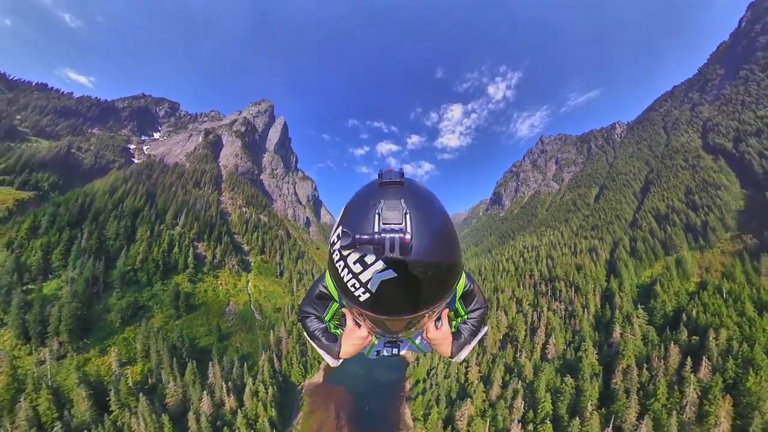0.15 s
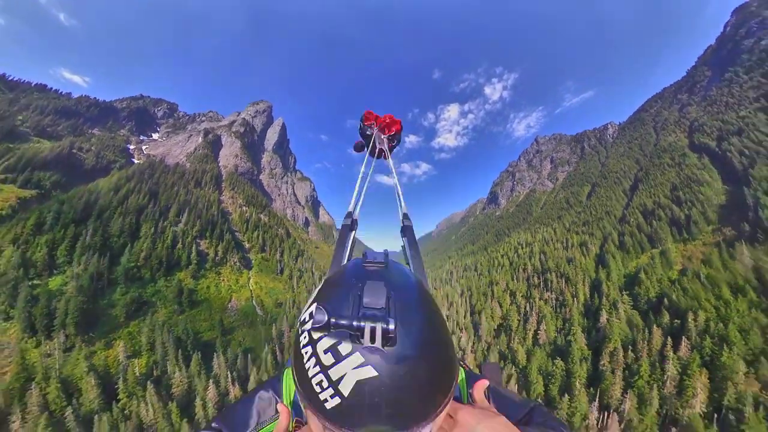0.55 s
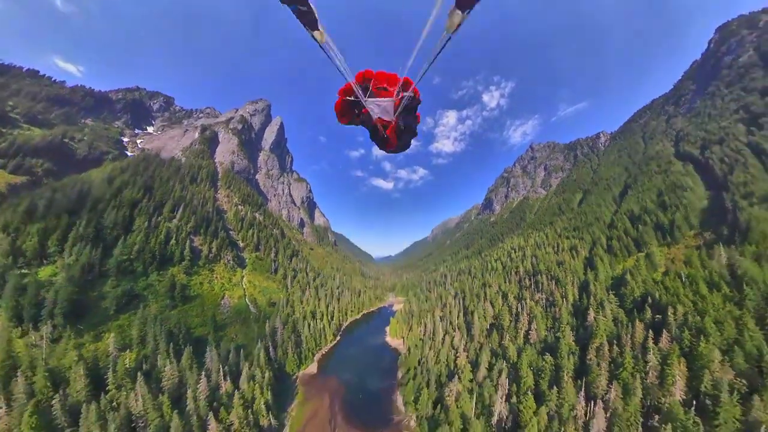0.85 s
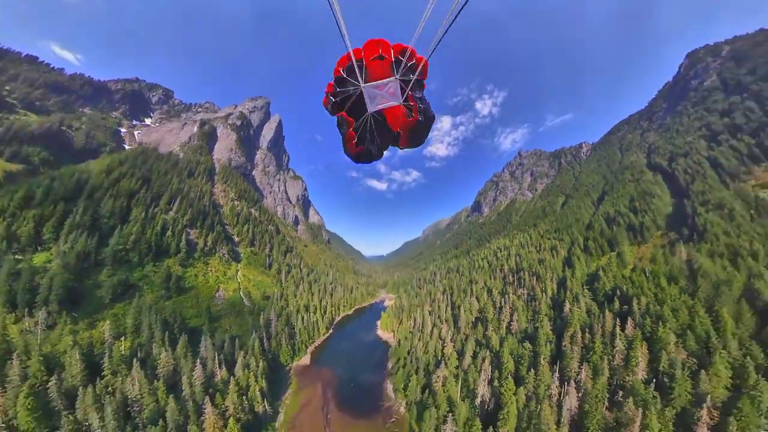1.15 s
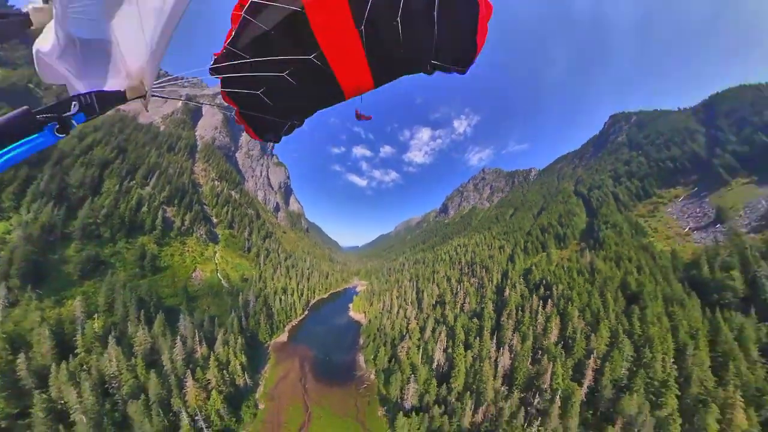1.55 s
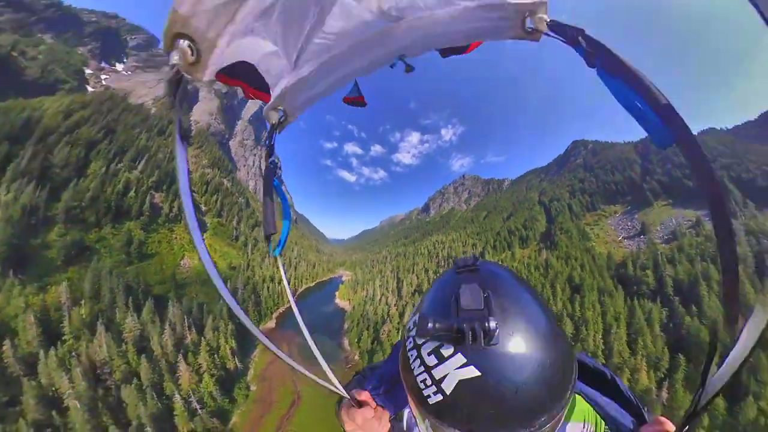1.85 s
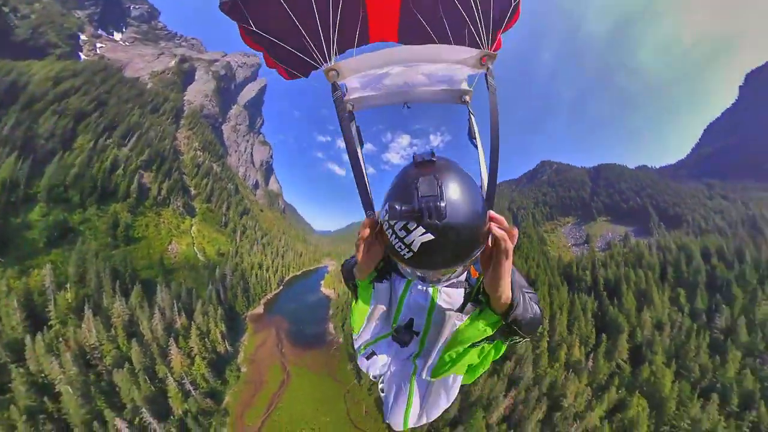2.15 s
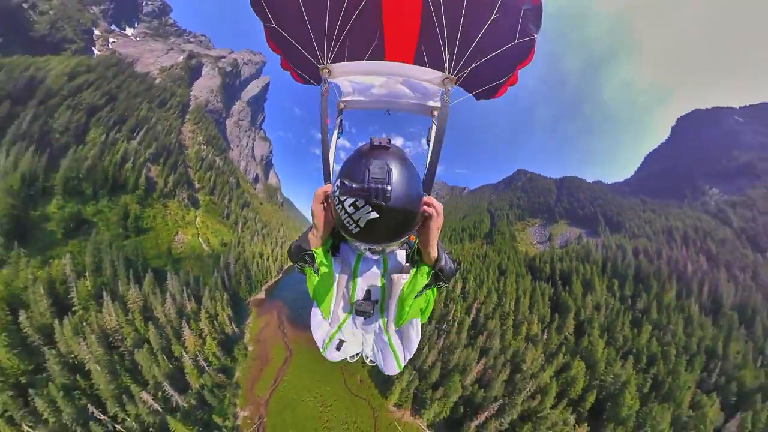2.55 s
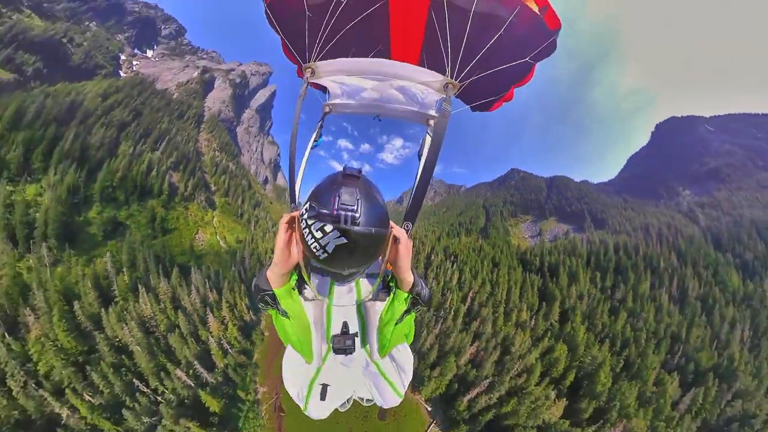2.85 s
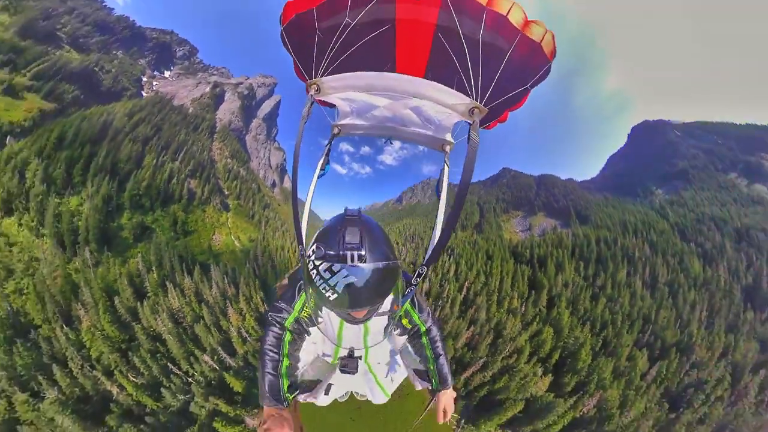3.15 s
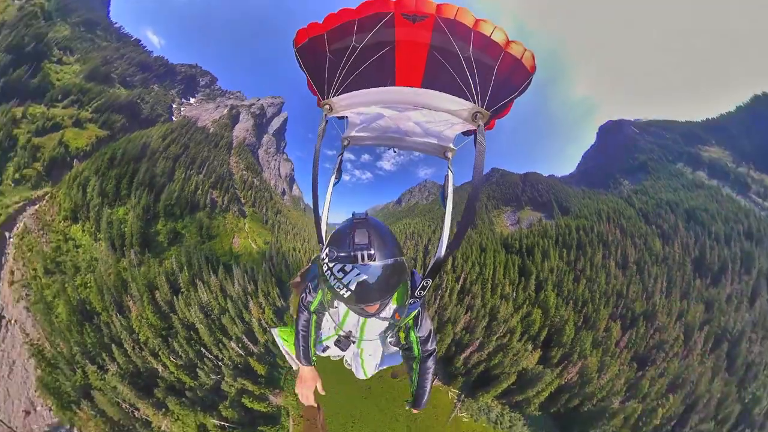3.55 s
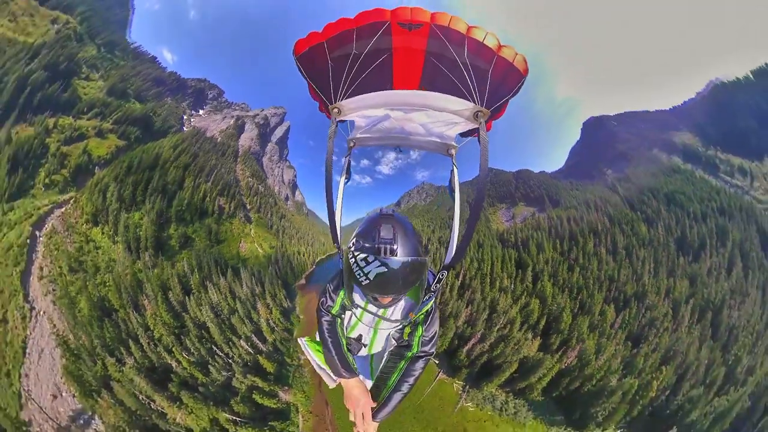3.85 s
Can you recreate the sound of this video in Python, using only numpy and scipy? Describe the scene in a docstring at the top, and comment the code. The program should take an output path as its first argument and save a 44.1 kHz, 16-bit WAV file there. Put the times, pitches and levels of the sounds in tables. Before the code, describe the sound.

Rushing wind hisses and faintly moans on a jumper's helmet microphone in open air, until a short rip of fabric releases the parachute. Heavy, thudding gusts follow, then uneven roaring wind with sharp canopy snaps, mainly on the right.

```python
"""Wind rushes over two microphone ports on a jumper's helmet, its turbulence heard as rumble, roar and hiss.
In free fall the flow is steady and moans over the housing, until fabric rips out of the pack on the left.
As the canopy fills and slows the fall, gusts buffet the ports unevenly, mostly the right one.
Air swishes over the left port, taut fabric snaps on the right, and harness hardware knocks once."""
import sys
import numpy as np
from scipy import signal
from scipy.fft import rfft, irfft
from scipy.io import wavfile
from scipy.ndimage import uniform_filter1d

SR = 44100
rng = np.random.default_rng(int(sys.argv[2]) if len(sys.argv) > 2 else 0)


def generate_wav(signal):
    """Clip the signal to [-1, 1] and save it as 16-bit WAV at the path in sys.argv[1]."""
    frames = np.transpose(np.atleast_2d(signal))
    scaled = np.clip(frames, -1, 1) * 32767
    pcm = np.round(scaled).astype(np.int16)
    wavfile.write(sys.argv[1], SR, pcm)


N = 176400
OPEN_S = 0.75  # the pack is open from here on
TURBULENCE_HZ, FLUTTER_HZ = 69, 244  # bandwidths of the level fluctuations of air and of fabric

# Wind envelopes at each port: t/s, rumble level/dB, roar level/dB, hiss level/dB
LEFT_WIND_LEVELS = [(0.0, -85, -50.5, -59), (0.55, -50, -48.5, -58), (0.68, -49, -57, -65),
                    (0.85, -50, -70, -45.5), (1.05, -49.5, -75, -50.5), (1.28, -68, -54, -55.5),
                    (1.39, -47, -60, -48), (1.5, -72, -69, -59), (1.71, -55, -61, -62.5),
                    (1.99, -56.5, -63, -75), (2.08, -56, -56, -87), (2.54, -39.5, -47, -89),
                    (2.75, -74, -79, -77), (3.08, -39.5, -43.5, -75), (3.3, -100, -74, -63),
                    (3.72, -89, -88, -96), (3.84, -32.5, -30.5, -85), (4.0, -45, -55, -84)]
RIGHT_WIND_LEVELS = [(0.0, -88, -49.5, -41), (0.4, -62, -48, -42.5), (0.586, -53, -60, -37),
                     (0.69, -50, -57, -55.5), (0.881, -49.5, -60, -70.5), (1.074, -48, -58, -65),
                     (1.1, -28, -55, -61), (1.32, -25, -50, -78), (1.391, -56, -33, -35),
                     (1.48, -62, -72, -48.5), (1.584, -54, -49, -44.5), (1.7, -40.5, -57.5, -66),
                     (1.89, -50.5, -49, -48.5), (2.002, -63, -60, -70), (2.042, -42, -40, -59),
                     (2.1, -34, -30.5, -77), (2.43, -46, -48.5, -71), (2.641, -36, -31.5, -56.5),
                     (2.742, -55, -45.5, -66.5), (2.854, -57, -28.5, -58), (2.93, -49, -37, -62),
                     (2.96, -59, -50.5, -72), (3.09, -39, -36, -61.5), (3.51, -74, -37, -59.5),
                     (3.78, -46, -29.5, -77), (4.0, -40, -39, -58)]
# Spectra of the wind bands: f/Hz, relative level/dB
RUMBLE_SPECTRUM = [(30, 1), (60, -10), (125, -3), (250, 0.5), (400, -11.5), (560, -15.5), (1000, -46),
                   (4000, -69)]
LEFT_ROAR_SPECTRUM = [(100, -13), (300, -1.5), (500, 2), (1200, -8.5), (2000, -20.5), (3500, -51),
                      (8000, -83)]
RIGHT_ROAR_SPECTRUM = [(100, -86.5), (300, 7), (600, 4.5), (1000, 9.5), (1400, 2), (2000, -4), (4000, -20),
                       (8000, -72)]
LEFT_HISS_SPECTRUM = [(500, -5.5), (4000, -6), (16000, -29)]
RIGHT_HISS_SPECTRUM = [(500, -7.5), (1200, -1.5), (3000, -1.5), (6000, -3.5), (11000, -7), (16000, -11)]
# Tones of air over the housing: starting f/Hz, bandwidth/Hz, level/dB
HOUSING_TONES = [(223.6, 37, -47), (502, 99, -49)]
# Envelope of the fabric leaving the pack: t/s, relative level/dB
RIP_LEVELS = [(0.704, -88), (0.705, -37.5), (0.719, -38), (0.739, -25.5), (0.746, -35.5), (.768, -25),
              (0.791, -30.5), (.802, -37), (0.813, -52.5), (.85, -67)]
# Spectrum of that fabric: f/Hz, relative level/dB
RIP_SPECTRUM = [(500, -45), (674, -22.5), (1390, -18), (1540, -18), (3880, -3.5), (6670, -8), (15000, -33)]
# Bursts at each port, mostly gusts, plus short clicks on the left at 0.95-0.99 s and the bright burst of the
# harness knock at 2.94 s: peak t/s, duration/s, level/dB, centre f/Hz, bass tilt/dB, treble tilt/dB
LEFT_PORT_GUSTS = [(0.954, 0.013, -37, 2960, -3.5, -6), (0.980, 0.0031, -34, 2930, -4.5, -3.5),
                   (0.9885, 0.0071, -36.5, 2500, -4, -5.5), (1.096, 0.029, -33.5, 1650, -5, -9),
                   (1.139, 0.031, -32.5, 1002, -2, -6.5), (1.217, 0.092, -43, 1550, -7.5, -5.5),
                   (1.399, 0.022, -26.5, 359, -8, -5.5), (2.94, 0.014, -44, 5000, -3, -17),
                   (3.81, 0.01, -18, 267, -9.5, -10.5), (3.973, 0.072, -33.5, 620, -2.5, -12.5)]
RIGHT_PORT_GUSTS = [(1.108, 0.034, -14, 265.4, -12, -5), (1.152, 0.04, -19.5, 270, -6.5, 1),
                    (1.198, 0.0089, -13.5, 283, -21, -3.5), (1.211, 0.051, -23, 260, 6, 5),
                    (1.265, 0.03, -14.5, 266, -4.5, -1), (1.321, 0.012, -17, 238, -2, -2.5),
                    (1.346, 0.017, -16, 239, -20, 0), (1.404, 0.036, -12, 335, -5, 2.5),
                    (1.664, 0.042, -36.5, 181, -12, -1), (1.689, 0.014, -25, 670, 0.5, -14.5),
                    (1.799, 0.0088, -38.5, 1110, -16, -15), (1.821, 0.017, -33.5, 714, -1.5, -7.5),
                    (1.915, 0.025, -20.5, 700, -1.5, -14), (2.067, 0.023, -14, 1160, -5.5, -22),
                    (2.122, 0.049, -19, 1590, -12, -19), (2.168, 0.011, -23, 495, -5.5, -6.5),
                    (2.255, 0.063, -33, 1000, -6.5, -11.5), (2.574, 0.023, -19, 830, -6, -17),
                    (2.656, 0.093, -31.5, 486, -11, -16.5), (2.814, 0.045, -29, 1110, -10.5, -25.5),
                    (2.941, 0.015, -45.5, 5000, -5, -7), (3.075, 0.029, -29, 1010, -23, -26),
                    (3.188, 0.074, -30.5, 905, -10.5, -51), (3.287, 0.016, -40, 900, -2.5, -6),
                    (3.339, 0.025, -24, 754, -9, -12), (3.382, 0.0071, -31.5, 1150, -5, -9),
                    (3.445, 0.037, -31, 1020, -7.5, -15), (3.466, 0.015, -43.5, 4470, -7, -23),
                    (3.508, 0.013, -30, 1420, -8, -15.5), (3.592, 0.04, -26.5, 980, -9.5, -14),
                    (3.765, 0.023, -25.5, 626, -9, -11), (3.847, 0.039, -28.5, 694, -1, -5.5),
                    (3.95, 0.069, -31, 734, -3, -8.5)]
# Swells of air over the left port: peak t/s, duration/s, level/dB
AIR_SWISHES = [(1.547, 0.14, -49.5), (1.87, 0.14, -63), (3.234, 0.26, -59), (3.74, 0.091, -71)]
# Snaps of taut fabric: t/s, peak level/dB, f/Hz
FABRIC_SNAPS = [(1.822, -32, 2030), (2.052, -25, 1030), (2.092, -13, 1190), (2.1045, -8, 1080),
                (2.113, -4, 1080), (2.606, -17, 930), (2.656, -20, 910), (2.803, -17.5, 1000),
                (3.046, -22, 1000), (3.068, -14, 1000), (3.106, -17, 1020), (3.19, -16, 1065),
                (3.582, -15.5, 1060)]
# Modes of the harness hardware: f/Hz, relative level/dB, T60/s
HARDWARE_MODES = [(1360, 6.5, 0.0087), (2500, -7.5, 0.042)]


def gain_of(db):
    """Amplitude ratio of a level in dB."""
    return 10 ** (np.asarray(db) / 20)


def unit_rms(x):
    """Normalisation to unit mean power."""
    return x / np.sqrt(np.mean(x ** 2, -1, keepdims=True) + 1e-20)


def coloured(x, spectrum):
    """Spectral shaping to unit rms by (f/Hz, level/dB) points joined over log frequency."""
    bins_hz = np.fft.rfftfreq(x.shape[-1], 1 / SR)
    hz, db = np.transpose(spectrum)
    response = gain_of(np.interp(np.log(bins_hz + 1), np.log(hz), db))
    return unit_rms(irfft(rfft(x) * response, x.shape[-1]))


def wander(size, top_hz):
    """Low-pass noise: a random modulator of unit rms, 6 dB down at top_hz."""
    return coloured(rng.standard_normal(size), [(2, 0), (top_hz, -6), (4 * top_hz, -40)])


def noise_pair(correlation):
    """Partial coherence: two white noises share a common component."""
    common, separate = rng.standard_normal((2, N))
    return np.array([common, correlation * common + np.sqrt(1 - correlation ** 2) * separate])


def wind():
    """Turbulent pressure at each port: three noise bands, amplitude-modulated by the same eddies."""
    t, out = np.arange(N) / SR, np.zeros((2, N))
    is_open = t > OPEN_S
    depth_db = np.where(is_open, 1, 0.73)
    bands = [noise_pair(correlation) for correlation in (0.91, 0.069, 0.12)]  # rumble, roar, hiss
    ports = [(LEFT_WIND_LEVELS, (RUMBLE_SPECTRUM, LEFT_ROAR_SPECTRUM, LEFT_HISS_SPECTRUM)),
             (RIGHT_WIND_LEVELS, (RUMBLE_SPECTRUM, RIGHT_ROAR_SPECTRUM, RIGHT_HISS_SPECTRUM))]
    for port, (envelopes, spectra) in enumerate(ports):
        times, *levels = np.transpose(envelopes)
        eddies = wander(N, TURBULENCE_HZ)
        flutter = gain_of(3.5 * wander(N, FLUTTER_HZ) * is_open)  # fine grain from the loose fabric
        flutter /= np.where(is_open, flutter[is_open].std() + flutter.mean(), 1)
        for noise, spectrum, db, coupling in zip(bands, spectra, levels, (0.8, 0.9, 1.2)):
            wobble = coupling * eddies + 0.19 * wander(N, TURBULENCE_HZ)
            envelope = gain_of(np.interp(t, times, db) + depth_db * wobble)
            out[port] += coloured(noise[port] * flutter, spectrum) * envelope
    return out


def housing_moan(climb_per_s=0.35, fade_s=0.46, port_db=(-1, 0)):
    """Flow over the housing sounds narrow noise bands, which climb in pitch and fade as the pack opens."""
    t, tones = np.arange(N) / SR, 0
    climb = 1 + climb_per_s * np.minimum(t, OPEN_S)
    for hz, width_hz, db in HOUSING_TONES:
        lowpass = signal.butter(2, width_hz / 2, fs=SR)
        in_phase, quadrature = signal.lfilter(*lowpass, rng.standard_normal((2, N)))
        phase = 2 * np.pi * np.cumsum(hz * climb) / SR
        tones += gain_of(db) * unit_rms(in_phase * np.cos(phase) + quadrature * np.sin(phase))
    fade = np.clip((OPEN_S - t) / fade_s, 0, 1)
    return np.outer(gain_of(port_db), tones * fade)


def pack_rip(impulses_per_s=21000, spread_db=1.5, port_db=(9, -36)):
    """Shot noise: the tiny snaps of fabric pulled from the pack merge into one rip."""
    t = np.arange(N) / SR
    impulses = (rng.random(N) < impulses_per_s / SR) * rng.choice([-1., 1.], N)
    impulses *= gain_of(spread_db * (rng.exponential(1, N) + wander(N, top_hz=220)))
    envelope = gain_of(np.interp(t, *np.transpose(RIP_LEVELS), left=-120, right=-120))
    return np.outer(gain_of(port_db), coloured(impulses, RIP_SPECTRUM) * envelope)


def gust_spectrum(hz, bass_tilt, treble_tilt, deep_hz=340):
    """A gust's energy forms a hump near hz; deep gusts end at a cliff, with only fabric crackle above."""
    lower = [(hz / 16, 4 * bass_tilt + 12), (hz / 1.3, 1)]
    knee_db = treble_tilt - 3
    if hz >= deep_hz:
        return lower + [(1.45 * hz, -1), (3.19 * hz, knee_db), (64 * hz, 6 * knee_db)]
    cliff_hz, cliff_db = 1.88 * hz, -22
    crackle_db = cliff_db + 3 * knee_db
    cliff = [(cliff_hz, -5), (0.85 * cliff_hz, -14), (0.96 * cliff_hz, cliff_db)]
    return lower + cliff + [(3950, crackle_db), (16000, crackle_db - 31)]


def gusts(table, edge_db=-4.5, grain_db=4, size=16384):
    """Each burst at a port is grainy noise, rising faster than it decays; most are gusts striking the port, a
    few are short clicks or the harness knock's burst."""
    out = np.zeros(N + size)
    t = (np.arange(size) - size / 2) / SR
    steepness = np.where(t < 0, 2.98, 1.72)
    for peak_s, duration, db, hz, bass_tilt, treble_tilt in table:
        grain = rng.standard_normal(size) * gain_of(grain_db * wander(size, 4 * TURBULENCE_HZ))
        noise = coloured(grain, gust_spectrum(hz, bass_tilt, treble_tilt))
        envelope = gain_of(db + edge_db * abs(2 * t / duration) ** steepness)
        burst = noise * envelope
        burst /= np.sqrt(np.sum(burst ** 2) / np.sum(envelope ** 2))  # the envelope sets the energy
        at = round(peak_s * SR)
        out[at:at + size] += burst[:len(out) - at]
    return out[size // 2:][:N]


def gust_leak(buffets, cutoff_hz=1100, leak_db=-24.5, shelter_db=-49):
    """Crosstalk: the low part of a gust reaches the other port, less so when that port is sheltered."""
    t = np.arange(N) / SR
    crossed = signal.lfilter(*signal.butter(2, cutoff_hz, fs=SR), buffets[::-1])
    rumble_db = np.array([np.interp(t, *np.transpose(levels)[:2])
                          for levels in (LEFT_WIND_LEVELS, RIGHT_WIND_LEVELS)])
    return crossed * gain_of(leak_db + np.minimum(rumble_db - shelter_db, 0))


def air_swishes(cutoff_hz=8000):
    """Flow noise: air sliding over the left port gives treble hiss in Gaussian swells."""
    t = np.arange(N) / SR
    hiss = unit_rms(signal.lfilter(*signal.butter(2, cutoff_hz, "high", fs=SR), rng.standard_normal(N)))
    swells = sum(gain_of(db) * np.exp(-(2 * (t - peak_s) / duration) ** 2)
                 for peak_s, duration, db in AIR_SWISHES)
    return np.array([hiss * swells, np.zeros(N)])


def fabric_snaps(rise_s=0.0006, t60_s=0.027):
    """Damped oscillation: taut fabric snaps beside the right port and dies away in a few cycles."""
    t, out = np.arange(2048) / SR, np.zeros((2, N))
    envelope = np.minimum(t / rise_s, 1) ** 2 * gain_of(-60 * np.maximum(t - rise_s, 0) / t60_s)
    for peak_s, db, hz in FABRIC_SNAPS:
        at = round((peak_s - rise_s) * SR)
        out[1, at:at + len(t)] += gain_of(db) * envelope * np.cos(2 * np.pi * hz * (t - rise_s))
    return out


def harness_clack(strike_s=2.932, rise_s=0.0013, port_db=(-19, -40)):
    """Free vibration: one knock excites the hardware's modes, and each decays exponentially."""
    t = np.maximum(np.arange(N) / SR - strike_s, 0)
    ring = sum(gain_of(db - 60 * t / t60) * np.sin(2 * np.pi * hz * t) for hz, db, t60 in HARDWARE_MODES)
    return np.outer(gain_of(port_db), ring * np.minimum(t / rise_s, 1))


def patchy(x, depth_db=3):
    """Time-varying filtering: random gains over time and frequency give hollow, shifting patches."""
    spectra = signal.stft(x, nperseg=512, noverlap=384)[2]
    field = uniform_filter1d(rng.standard_normal(spectra.shape), size=3, axis=1)  # across frequency
    field = uniform_filter1d(field, size=20, axis=2)  # across time
    spectra *= gain_of(depth_db * field / field.std())
    return signal.istft(spectra, nperseg=512, noverlap=384)[1][:, :N]


def scene():
    """Superposition of all sources at the left and right ports."""
    buffets = np.array([gusts(LEFT_PORT_GUSTS), gusts(RIGHT_PORT_GUSTS)])
    broadband = wind() + air_swishes() + buffets + gust_leak(buffets) + pack_rip()
    return patchy(broadband) + housing_moan() + fabric_snaps() + harness_clack()


def record(dry):
    """Band-pass response: the microphones roll off below 70 Hz, and the band ends near 16 kHz."""
    thinned = signal.lfilter(*signal.butter(2, 70, "high", fs=SR), dry)
    band_limit = signal.firwin(511, 15950, window=("kaiser", 9), fs=SR)
    return signal.oaconvolve(thinned, band_limit[None], "same")


dry = scene()
out = record(dry)
generate_wav(out)
```